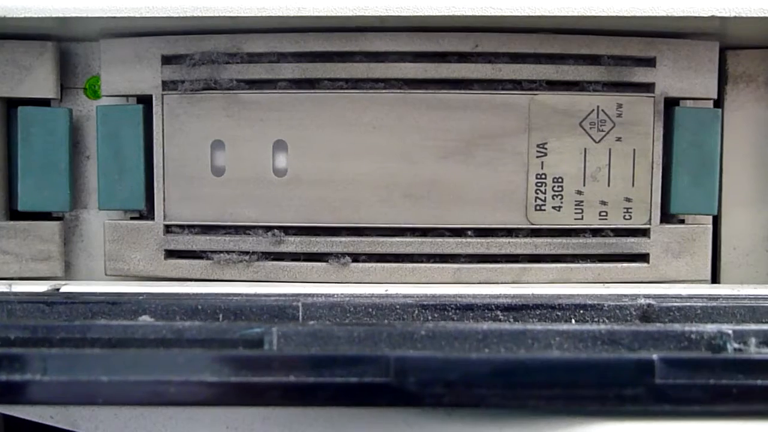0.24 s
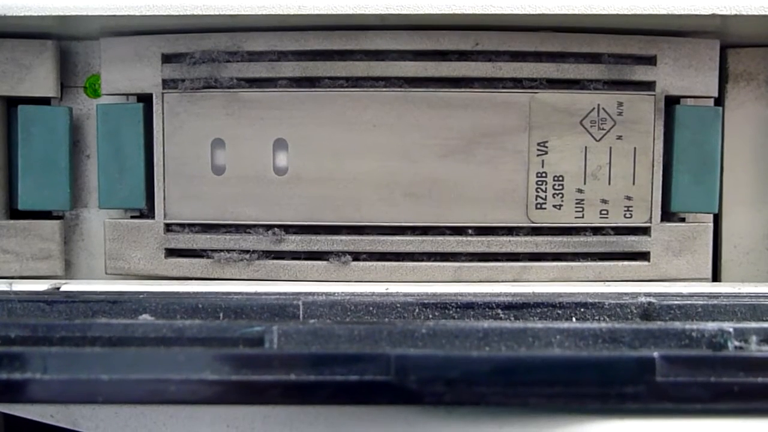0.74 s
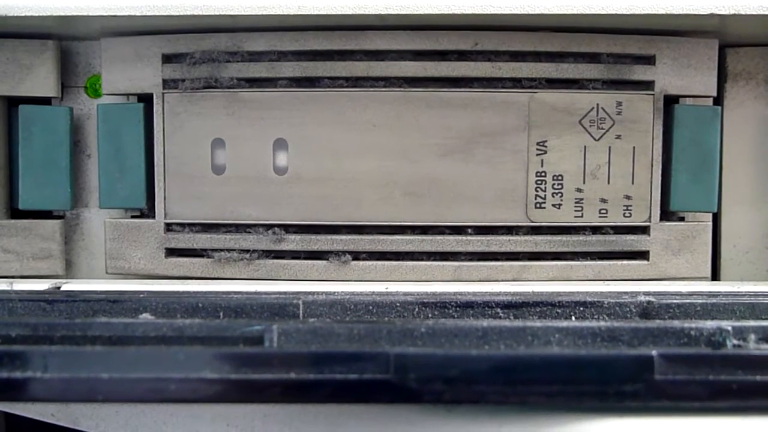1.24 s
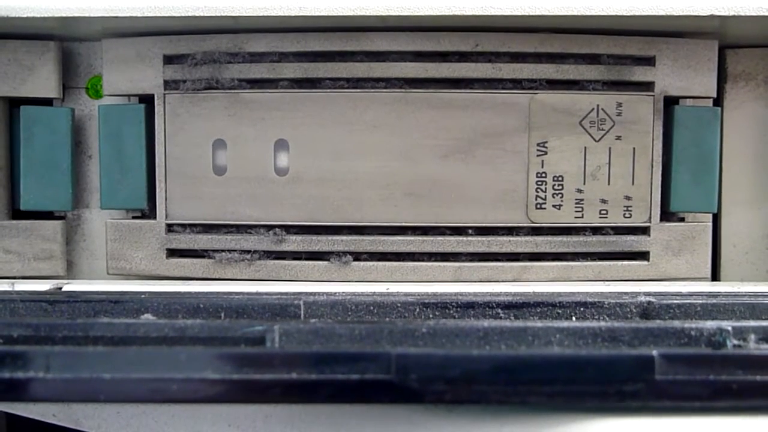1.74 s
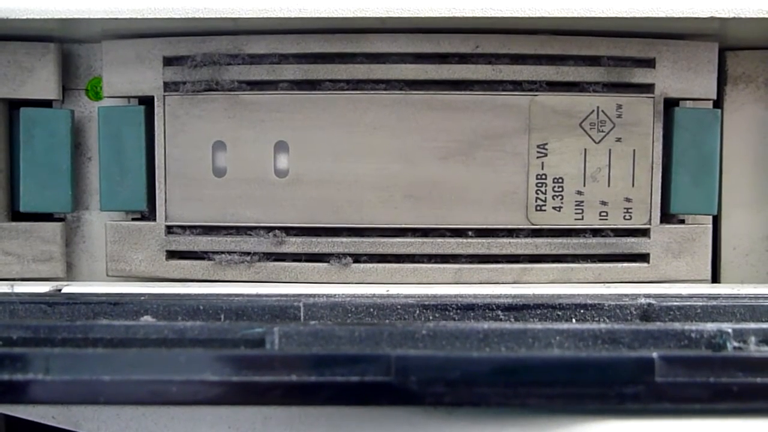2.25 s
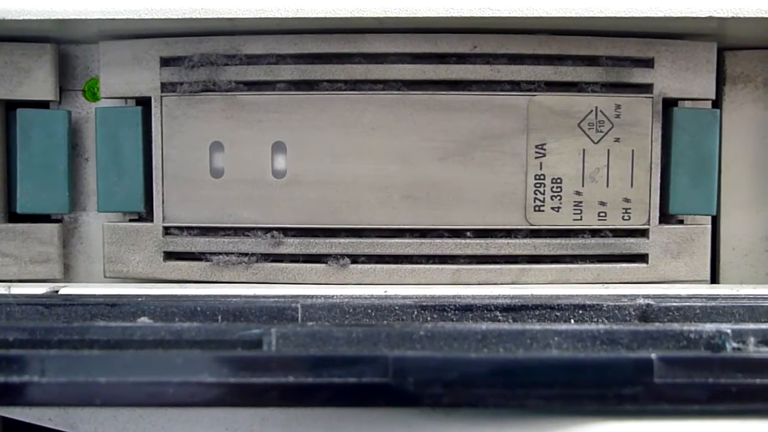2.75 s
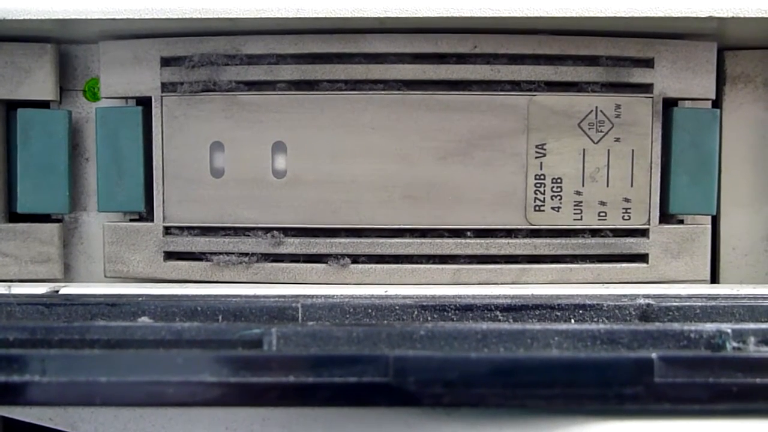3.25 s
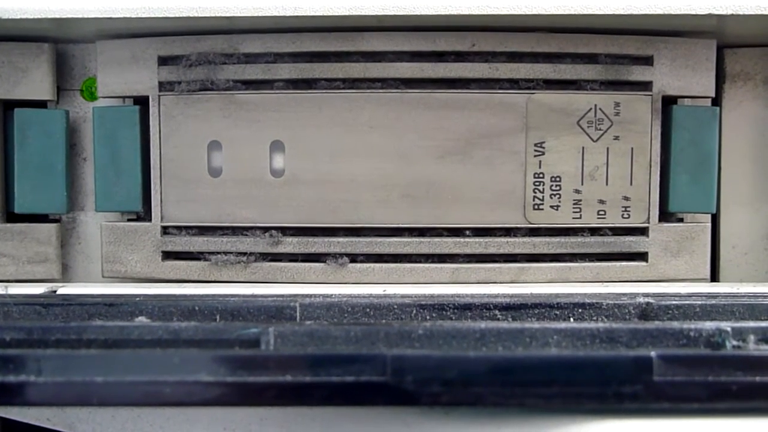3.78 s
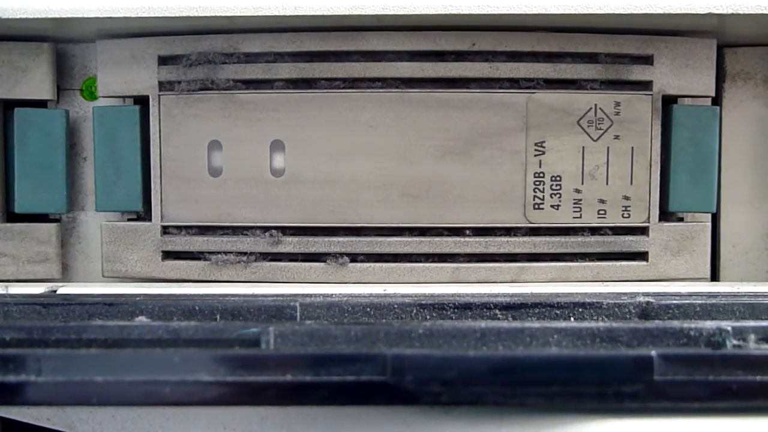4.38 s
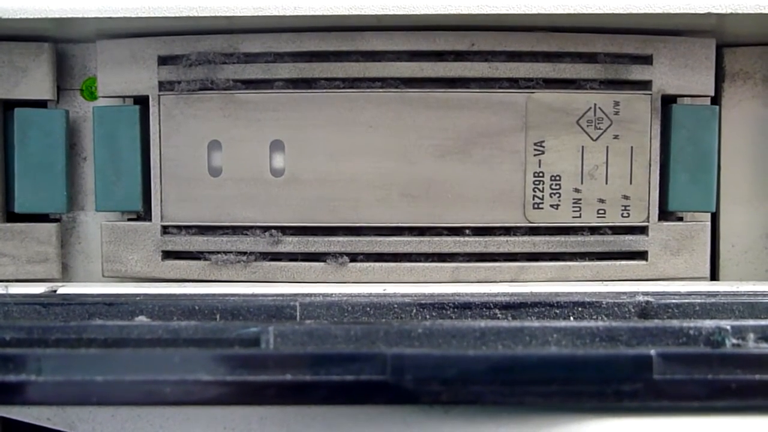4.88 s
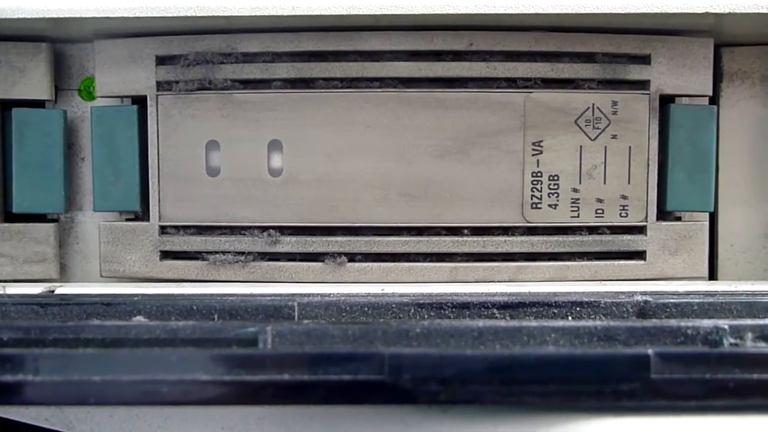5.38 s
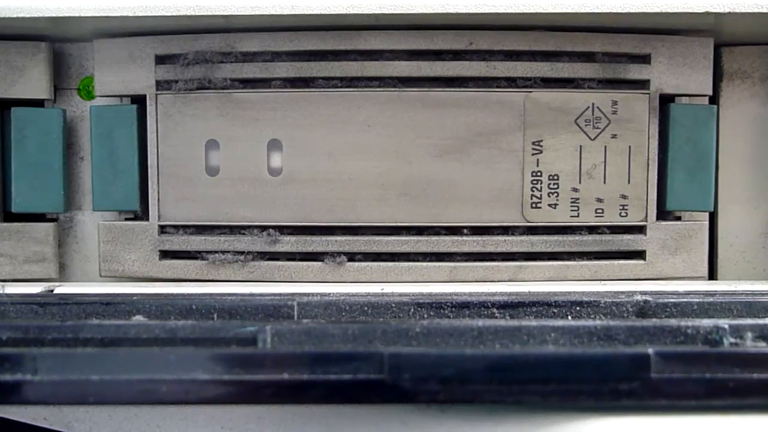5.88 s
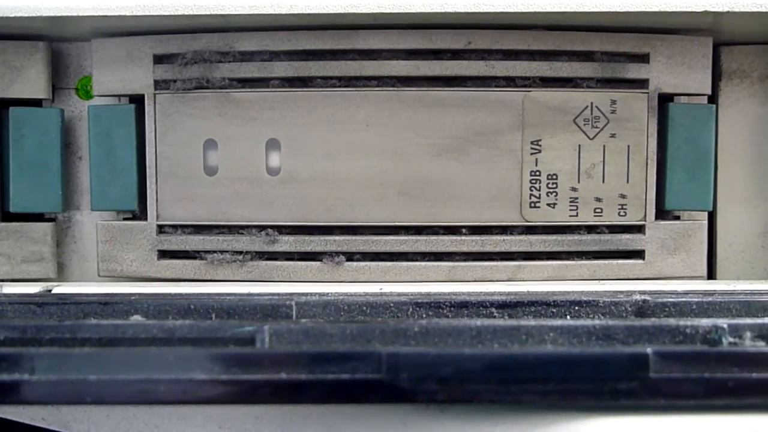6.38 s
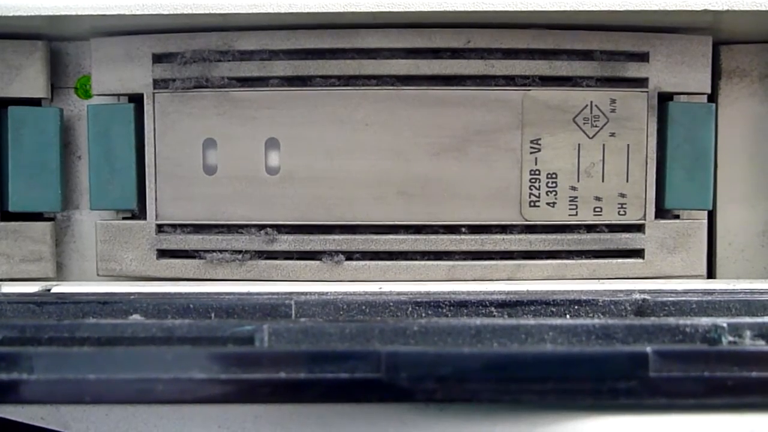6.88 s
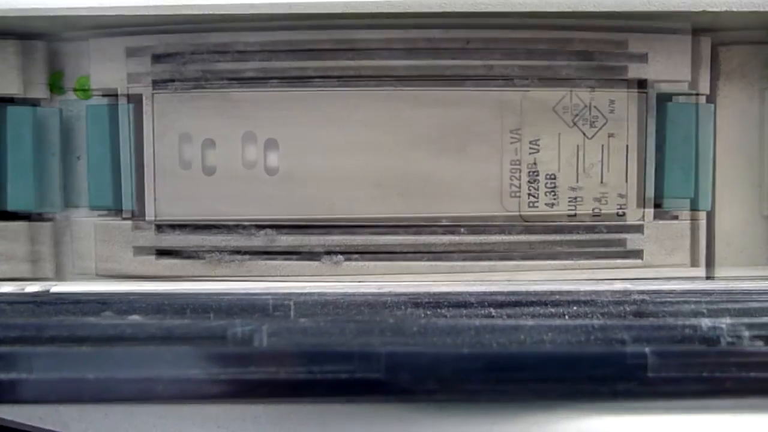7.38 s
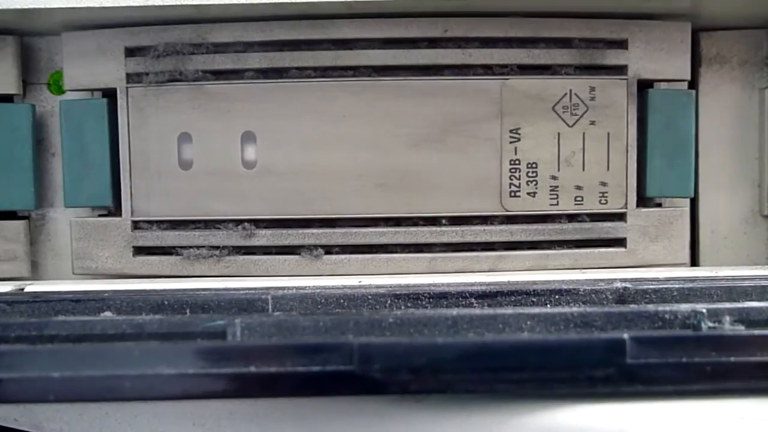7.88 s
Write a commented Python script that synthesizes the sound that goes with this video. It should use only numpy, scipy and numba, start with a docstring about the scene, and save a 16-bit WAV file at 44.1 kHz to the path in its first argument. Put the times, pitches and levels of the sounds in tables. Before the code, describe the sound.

An old hard drive in a metal storage shelf, heard very close. Its bearings sing a dense cluster of high tones, already loud, gliding upward quickly at first and then ever more slowly. Individual pitches swell, beat and ring out as they meet the casing's resonances. One tiny sharp click comes near the end of the climb, then the whine holds steady. Rolling hiss and low fan hum continue beneath.

```python
"""The spindle bearings of a hard drive sing a dense family of tones that rise as the drive spins up.
The tones follow the shaft angle, beat because the balls differ in size, and light up as they cross the
resonances of the casing. Rolling noise fills the same resonances, the head latch clicks once as three quick
blows of noise and ringing, and fans hum on as steady tones over low air noise.
The drive sits in a metal storage shelf, close to a small microphone with gain control."""
import sys
import numpy as np
from scipy import signal
from scipy.fft import rfft, irfft, next_fast_len
from scipy.io import wavfile
from scipy.ndimage import uniform_filter1d, map_coordinates
from numba import njit

SR = 44100
rng = np.random.default_rng(int(sys.argv[2]) if len(sys.argv) > 2 else 0)


def rack_gain(trim_db):
    """Turn a fader trim in dB into the linear factor to multiply a signal by."""
    fader = np.asarray(trim_db, float)
    return 10 ** (fader / 20)


def generate_wav(sig):
    """Save sig (samples, or channels by samples) to the path in sys.argv[1] as 16-bit PCM at SR."""
    pcm = np.round(np.clip(np.atleast_2d(sig).T, -1, 1) * 32767).astype(np.int16)
    wavfile.write(sys.argv[1], SR, pcm)


N = 358533  # length in samples


def spectrum_db(table, hz):
    """Reads a (Hz, dB) table along straight lines on a log-frequency axis."""
    points_hz, db = np.transpose(table)
    return np.interp(np.log(hz + 1), np.log(points_hz), db)


def colour(x, gain_db):
    """Filters a sound by a gain in dB given as a function of Hz."""
    size = next_fast_len(len(x))
    hz = np.arange(size // 2 + 1) * SR / size
    return irfft(rfft(x, size) * rack_gain(gain_db(hz)), size)[:len(x)]


def walk(rate):
    """Random wandering with a spread near 1: levels held for 1 / rate seconds, then smoothed twice."""
    hold = int(SR / rate)
    steps = np.repeat(rng.standard_normal(N // hold + 1), hold)
    return 1.3 * uniform_filter1d(uniform_filter1d(steps, hold), hold)[:N]


# How the spindle spins up. Each row: time in seconds, shaft turns per second.
SHAFT = [(0.0, 87.86), (0.4, 92.33), (0.8, 96.37), (1.2, 100.24), (1.6, 103.72), (2.0, 106.95),
         (2.4, 109.79), (2.8, 112.17), (3.2, 114.32), (3.6, 116.18), (4.0, 117.83), (4.4, 119.22),
         (4.72, 120.13), (5.07, 120.61), (5.17, 120.52), (5.32, 119.99), (8.13, 120.0)]


def shaft_speed():
    """Speed of the spindle as a fraction of its full speed, 120 turns per second."""
    seconds, turns_per_s = np.transpose(SHAFT)
    return np.interp(np.arange(N) / SR, seconds, turns_per_s) / 120


# The balls differ a little in size, so their tones beat. One number a ball: spins per second at full speed.
BALL_HZ = [212.26, 212.34, 212.46, 212.55, 212.63]
# How the balls share each tone. Each row: relative level in dB, dB gained per multiple of the spin.
BALL_SHARE = [(-4, -0.024), (-15, 0.39), (-1, -0.17), (-13.5, 0.17), (-4, -0.096)]
# Even multiples of the spin, from 4 up. Each row: rms levels into the casing in dB of the lower side line,
# the multiple itself and the upper side line.
EVEN_DB = [(-48, -45, -29), (-31, -20, -29), (-29.5, -24.5, -28.5), (-28, -26.5, -32.5),
           (-34.5, -29.5, -24.5), (-30.5, -40, -30.5), (-31, -41, -32), (-31, -62, -31.5),
           (-31.5, -34, -39), (-27, -37, -34.5), (-31, -34.5, -33), (-31, -35, -37), (-35.5, -42, -35),
           (-31, -39, -33), (-37, -30.5, -42), (-41, -41, -36.5), (-41, -35, -58), (-44.5, -31.5, -39.5),
           (-55, -41, -35)]
# Odd multiples of the spin, from 3 up. Each row: the same three levels in dB.
ODD_DB = [(-50, -52, -27), (-50, -32, -36), (-42, -29.5, -46), (-29, -57, -35.5), (-42, -35, -36),
          (-52, -50, -48), (-44, -34, -61), (-39, -48, -36.5), (-48, -50, -50), (-47, -38.5, -42)]
# The ball with the deepest dent. One number a multiple, even ones first, then odd: index of the ball.
LEAD_BALL = [0, 4, 0, 2, 2, 2, 2, 1, 0, 4, 1, 0, 4, 1, 1, 0, 0, 2, 0, 2, 0, 2, 4, 2, 0, 4, 4, 0, 1]


def ball_tones():
    """Dents ring at multiples of the ball spin, with side lines where the race passes the cage: (Hz, dB)."""
    race_past_cage_hz = 75.6  # at full speed
    scatter_db, lead_db = 2.5, 5.5
    even, odd, high = np.arange(4, 42, 2), np.arange(3, 23, 2), np.arange(42, 70, 2)
    multiple = np.r_[even, odd, high][:, None, None]

    # the high even multiples have no table: they fade by 1.78 dB per kHz, the middle line 5 dB weaker
    faint_db = -38 - 1.78 * (high - high[0]) * BALL_HZ[0] / 1000
    high_db = faint_db[:, None] + [0, -5, 0]
    line_db = np.r_[EVEN_DB, ODD_DB, high_db][:, :, None]

    # every ball sounds all three lines of every multiple
    side = np.array([[-1], [0], [1]])
    hz = multiple * np.array(BALL_HZ) + race_past_cage_hz * side
    ball_db, tilt_db = np.transpose(BALL_SHARE)
    share = rack_gain(ball_db + tilt_db * multiple + scatter_db * rng.standard_normal(hz.shape))
    share[np.arange(len(LEAD_BALL)), :, LEAD_BALL] *= rack_gain(lead_db)
    # the shares of the balls add up to the power of the line
    share_db = 20 * np.log10(share / np.linalg.norm(share, axis=2, keepdims=True))
    return hz.ravel(), (line_db + share_db).ravel()


# Loudest moments of the beating tones. Each row: time of the peak in seconds, tone in Hz at full speed,
# seconds from the peak until it fades to about a seventh, rms level in dB at the peak after the casing.
LOUD_MOMENTS = [(0.078, 2470, 0.55, -19), (0.053, 6446, 0.061, -25.5), (0.2, 1190, 0.34, -41),
                (0.698, 2920, 0.086, -16.5), (0.87, 3045, 0.32, -20), (1.054, 1268, 0.16, -24),
                (1.36, 2540, 0.32, -26.5), (1.436, 5580, 0.098, -21.5), (1.627, 1276, 0.32, -31),
                (1.71, 6870, 0.12, -31.5), (1.784, 2560, 0.28, -28), (1.793, 5620, 0.13, -26),
                (1.8, 425, 0.47, -41), (1.81, 5096, 0.068, -29), (2.22, 1698, 0.11, -29.5),
                (2.26, 2555, 0.18, -21.5), (2.46, 2637, 0.18, -21.5), (2.5, 5019, 0.14, -26),
                (2.68, 5170, 0.079, -32), (2.738, 2480, 0.16, -20.5), (2.881, 2625, 0.23, -17.5),
                (3.004, 1698, 0.54, -27.5), (3.2, 5170, 0.55, -35.5), (3.12, 2625, 0.17, -17),
                (3.25, 2474, 0.2, -19.5), (3.556, 1350, 0.18, -35), (4.15, 1353, 0.25, -32),
                (3.447, 2625, 0.09, -18.5), (3.72, 2472, 0.29, -16.5), (4.122, 2628, 0.063, -19.5),
                (4.142, 1623, 0.13, -25), (4.155, 2474, 0.062, -23), (4.305, 3050, 0.28, -32.5),
                (4.442, 2095, 0.21, -23.5), (4.823, 4760, 0.17, -26.5), (4.9, 4602, 0.1, -22.5),
                (5.106, 4753, 0.16, -26.5), (5.14, 1698, 0.22, -25.5), (5.165, 4602, 0.067, -22),
                (5.516, 2120, 0.14, -22.5), (5.586, 4602, 0.1, -25.5), (5.87, 4602, 0.055, -24),
                (6.11, 2125, 0.11, -25.5), (6.242, 4602, 0.063, -25.5), (6.495, 4602, 0.069, -27),
                (6.705, 4602, 0.12, -25), (6.76, 2474, 0.066, -23), (6.968, 4602, 0.07, -26),
                (7.22, 4602, 0.082, -23.5), (7.44, 2125, 0.25, -24.5), (7.46, 4602, 0.052, -22.5),
                (7.77, 2446, 0.088, -23), (7.95, 2440, 0.14, -24.5), (7.954, 4602, 0.092, -24)]


def bearings(speed):
    """Ball tones locked to the shaft angle: laid out at full speed, then played at the pace of the shaft."""
    size, rate = 2 ** 20, 3 * SR  # samples in the loop of full-speed tones, and its sample rate
    hz, db = ball_tones()
    clusters = len(hz) // len(BALL_HZ)

    # a faint neighbour at a small random offset from each tone makes the beats less regular
    neighbour_hz = hz * (1 + 0.0012 * rng.standard_normal(len(hz)))
    hz, db = np.r_[hz, neighbour_hz], np.r_[db, db - 13]
    tones = rack_gain(db) * np.exp(2j * np.pi * rng.random(len(hz)))

    # each cluster swells and fades slowly as a whole: a pair of close side tones does that
    draws = np.repeat(rng.random((clusters, 2)), len(BALL_HZ), axis=0)
    pace, turn = np.tile(draws, (2, 1)).T
    sway_hz = 0.7 * (0.5 + pace)
    sway = rack_gain(-17) * np.exp(2j * np.pi * turn)
    hz = np.r_[hz, hz + sway_hz, hz - sway_hz]
    tones = np.r_[tones, tones * sway, tones * sway.conj()]

    # add up the tones in one long loop, then read it at the shaft angle
    bins = np.round(hz * size / rate).astype(int)
    lines = np.zeros(size // 2 + 1, complex)
    np.add.at(lines, bins, tones)
    loop = irfft(lines) * size / np.sqrt(2)
    angle = np.cumsum(speed) * rate / SR  # in samples of the loop
    whine = map_coordinates(loop, [angle], order=3, mode="grid-wrap")

    for peak_s, tone_hz, length, peak_db in LOUD_MOMENTS:
        # the beating cluster gives way to one clear tone, then falls apart again
        first = max(int((peak_s - 1.5 * length) * SR), 0)
        last = min(int((peak_s + 1.5 * length) * SR), N)
        span = np.arange(first, last)
        cluster = np.unique(bins[abs(hz / tone_hz - 1) < 0.003])
        phases = 2 * np.pi * np.outer(cluster, angle[span]) / size
        beating = np.real(lines[cluster] @ np.exp(1j * phases))
        # take off what the casing will add at this pitch
        clear_db = peak_db - casing_db(tone_hz * speed[int(peak_s * SR)])
        clear = rack_gain(clear_db) * np.cos(2 * np.pi * tone_hz * angle[span] / rate)
        fade = np.exp(-2 * ((span / SR - peak_s) / length) ** 2)
        whine[span] += fade * np.sqrt(2) * (clear - beating)
    return whine


# Colour of the rolling noise on its way into the casing. Each row: frequency in Hz, relative level in dB.
ROLLING = [(600, -45.5), (1000, -26), (2400, -30), (4000, -33.5), (8000, -39), (12000, -43), (15500, -40)]


def rolling(speed):
    """Rough races and air between the platters: broad noise that softens with speed and flickers a little."""
    hiss = colour(rng.standard_normal(N), lambda hz: 20.5 + spectrum_db(ROLLING, hz))
    softening_db = -2 * np.log2(speed)  # 2 dB less for each doubling of speed
    flicker_db = 1.25 * walk(10)
    return hiss * rack_gain(softening_db + flicker_db)


# Broad response of the casing. Each row: frequency in Hz, gain in dB.
CASING_SLOPE = [(800, -24.5), (1200, -26.5), (1600, -12), (2400, 6.5), (2800, -8), (4000, -20),
                (4700, -19.5), (5500, -15), (7500, -14.5), (10000, -20.5), (11800, -12), (13000, -8),
                (14200, -28), (15600, -24)]
# Resonances and dips on top of it. Each row: centre in Hz, width in Hz, gain in dB (negative for a dip).
CASING_MODES = [(912, 26, 0.5), (1047, 31, 12.5), (1113, 128, 9), (1272, 138, 6.5), (1599, 130, 5),
                (1829, 27, 11), (1876, 153, -7), (2050, 193, -5), (2130, 26, 2.5), (2197, 152, -6.5),
                (2368, 92, -5), (2565, 31, -9.5), (2575, 74, 5), (2627, 25.5, -7), (2722, 113, -8.5),
                (2770, 37, 6.5), (2896, 34, -40), (3430, 330, -3), (3710, 540, 6), (4340, 47, 12.5),
                (4340, 67, -12.5), (4414, 55, 8.5), (4604, 61, 14.5), (4742, 68, 14.5), (4920, 350, 7),
                (5730, 200, 0.5), (5944, 300, 4.5), (6190, 55, 7.5), (7830, 68, -2), (8140, 166, 7.5),
                (9380, 850, 7.5), (9830, 121, -10), (11270, 390, 10.5), (12140, 390, 10), (12750, 480, -15),
                (14595, 281, 11.5)]


def casing_db(hz):
    """Casing and shelf: metal that rings strengthens some pitches and weakens others; gain in dB."""
    bells = sum(db / (1 + (2 * (hz - mode_hz) / width) ** 2) for mode_hz, width, db in CASING_MODES)
    return spectrum_db(CASING_SLOPE, hz) + bells


# Blows of the head latch. Each row: time in seconds, level in dB.
LATCH_BLOWS = [(4.5942, -12), (4.5952, -13), (4.5964, -8.5)]
# What the latch rings with. Each row: frequency in Hz, relative level in dB, seconds to fade by 60 dB.
LATCH_MODES = [(3650, 0.5, 0.025), (5260, -1.5, .015), (6200, -5, 0.011), (8630, -6, .012),
               (11200, -11, .015)]


def latch():
    """The latch lets go and rattles: each blow is a dry crack over a short ring."""
    t = np.arange(SR // 10) / SR
    ring = np.zeros(len(t))
    for hz, db, t60 in LATCH_MODES:
        ring += rack_gain(db) * np.sin(2 * np.pi * hz * t) * np.exp(-np.log(1000) * t / t60)
    crack_band = signal.butter(4, [3300, 11800], "bandpass", fs=SR, output="sos")
    crack_fade = np.exp(-np.log(1000) * t / 0.014)  # 60 dB in 14 ms
    out = np.zeros(N)
    for start_s, blow_db in LATCH_BLOWS:
        crack = signal.sosfilt(crack_band, rng.standard_normal(len(t)) * crack_fade)
        start = int(start_s * SR)
        out[start:start + len(t)] += rack_gain(blow_db) * (ring + rack_gain(5.5) * crack)
    # so small a part radiates no bass
    return signal.sosfilt(signal.butter(4, 3000, "highpass", fs=SR, output="sos"), out)


# Blade tones of the fans. One number a tone: frequency in Hz.
FAN_HZ = [325.85, 321.95, 270.0, 266.6, 600.0, 66.5, 1056.4]
# Their loudness. One number a tone: rms level in dB, around which it wavers.
FAN_DB = [-40, -46.5, -54, -58, -54, -82, -41.5]
# Colour of the air noise. Each row: frequency in Hz, relative level in dB.
FAN_AIR = [(25, -45), (80, -28.5), (185, -16.5), (270, 1), (300, -2), (360, -2.5), (440, -6), (540, -4.5),
           (640, 0), (760, -6.5), (950, -3.5), (1300, -13.5), (2200, -58)]


def fans():
    """Turning blades give nearly steady tones, close ones beating, and stir up low air noise."""
    t = np.arange(N) / SR
    tones = np.zeros(N)
    for hz, db in zip(FAN_HZ, FAN_DB):
        level = np.sqrt(2) * rack_gain(db + 0.25 * walk(1.14))
        tones += level * np.sin(2 * np.pi * (hz * t + rng.random()))
    air = colour(rng.standard_normal(N), lambda hz: spectrum_db(FAN_AIR, hz))
    return tones + rack_gain(-38) * air / air.std()


def scene():
    """The drive heard through its casing, with the latch and the fans added."""
    speed = shaft_speed()
    drive = colour(bearings(speed) + rolling(speed), casing_db)
    return (drive + latch() + fans())[None]


@njit
def peak_follower(x, attack, release, start):
    """Envelope that jumps up with peaks and sinks slowly."""
    out, envelope = np.empty(len(x)), start
    for i in range(len(x)):
        size = abs(x[i])
        envelope += (size - envelope) * (attack if size > envelope else release)
        out[i] = envelope
    return out


def gain_control(dry):
    """Turns the level down after peaks and lets it creep back."""
    attack_s, release_s = 0.00058, 0.4
    peaks = peak_follower(dry[0], 1 / (attack_s * SR), 1 / (release_s * SR), 0.28)
    gain = (0.31 / peaks) ** 0.78
    return dry * uniform_filter1d(gain, size=SR // 200)  # smoothed over 5 ms


def roll_off(x):
    """The treble ends steeply here."""
    return signal.sosfilt(signal.butter(12, 15650, fs=SR, output="sos"), x)


def record(dry):
    """Small microphone: gain control, rounding of the loudest peaks, little bass and a cut top."""
    levelled = gain_control(dry)
    rounded = levelled / (1 + (levelled / 0.75) ** 4) ** 0.25
    thin = signal.sosfilt(signal.butter(2, 80, "highpass", fs=SR, output="sos"), rounded)
    mix = signal.sosfilt(signal.ellip(8, 0.2, 70, 15760, fs=SR, output="sos"), thin)
    return roll_off(mix)


dry = scene()
out = record(dry)
generate_wav(out)
```